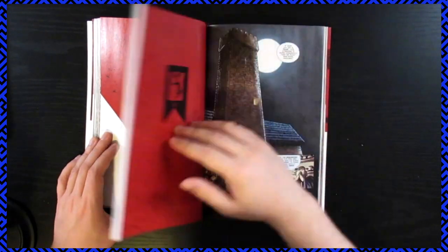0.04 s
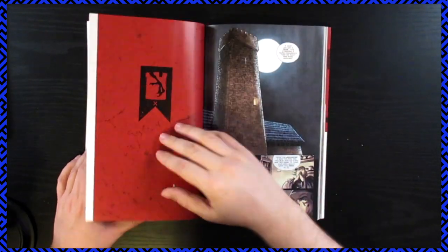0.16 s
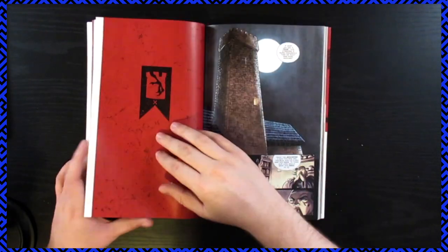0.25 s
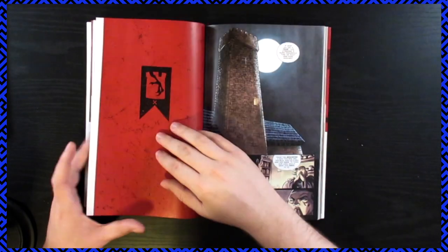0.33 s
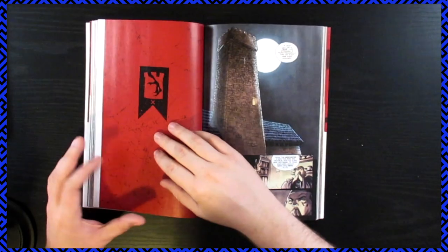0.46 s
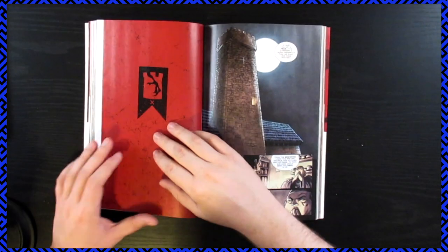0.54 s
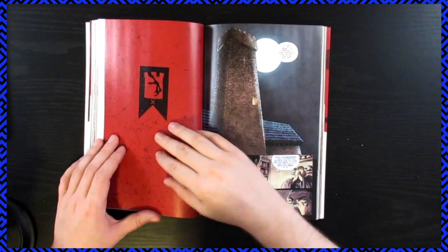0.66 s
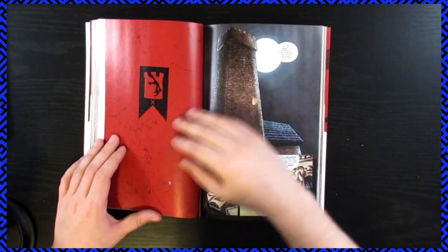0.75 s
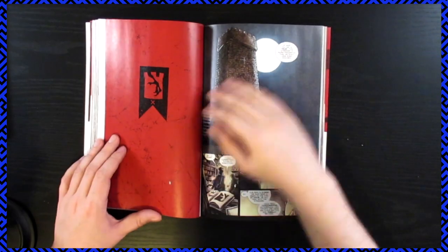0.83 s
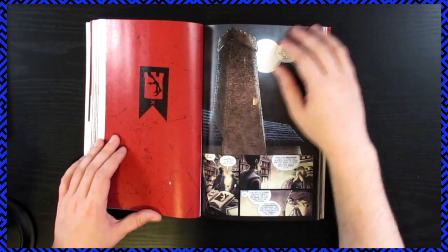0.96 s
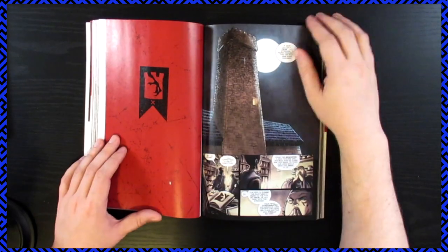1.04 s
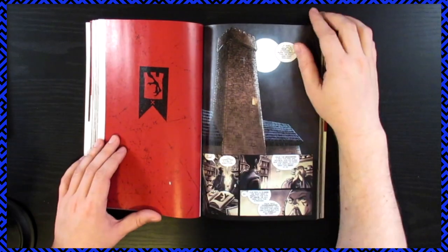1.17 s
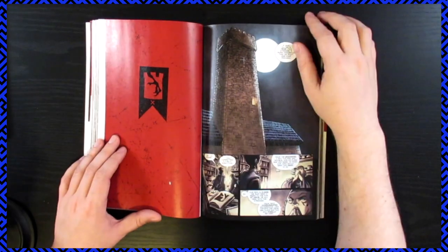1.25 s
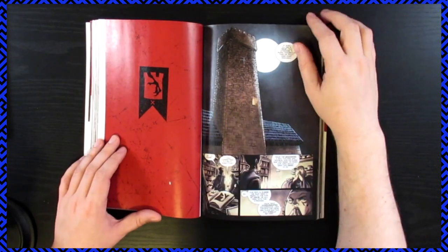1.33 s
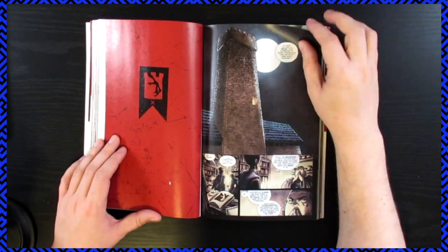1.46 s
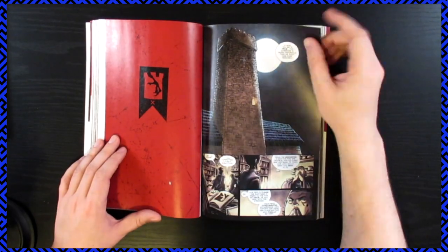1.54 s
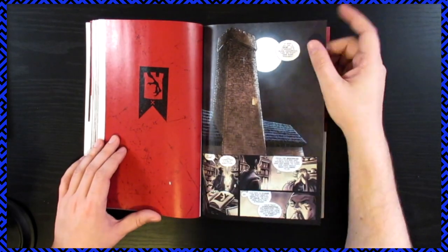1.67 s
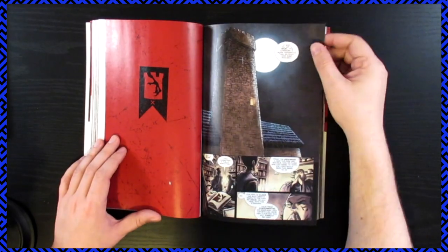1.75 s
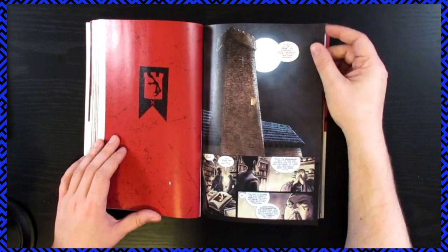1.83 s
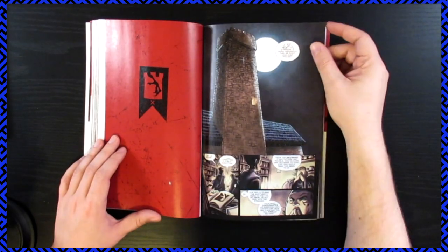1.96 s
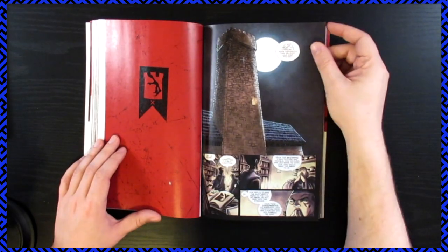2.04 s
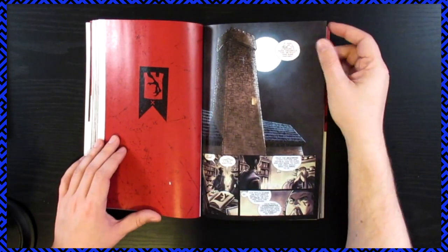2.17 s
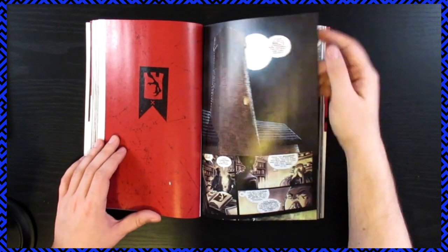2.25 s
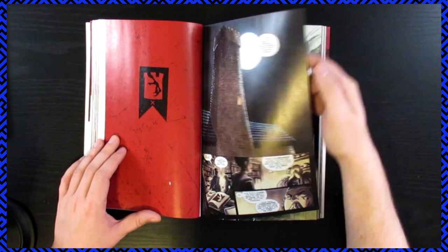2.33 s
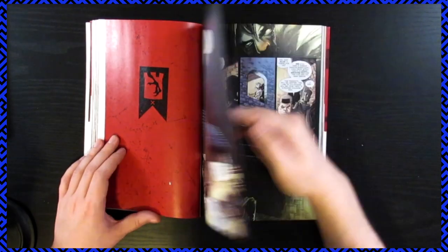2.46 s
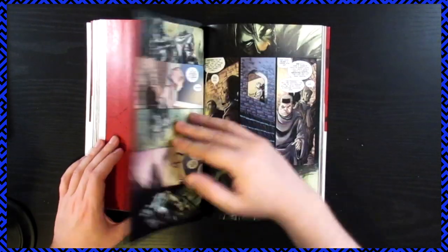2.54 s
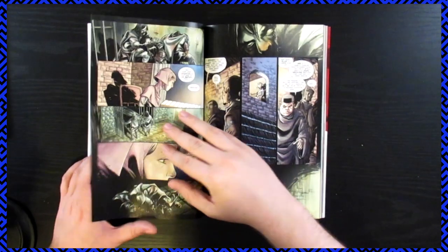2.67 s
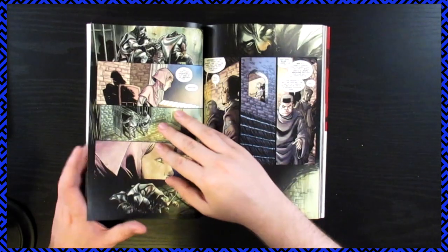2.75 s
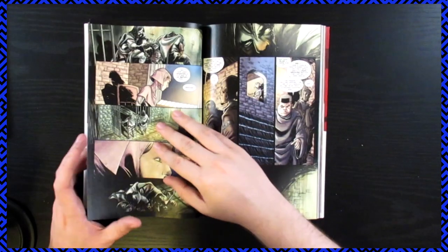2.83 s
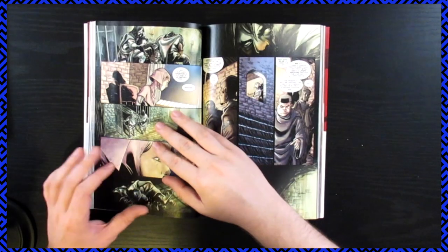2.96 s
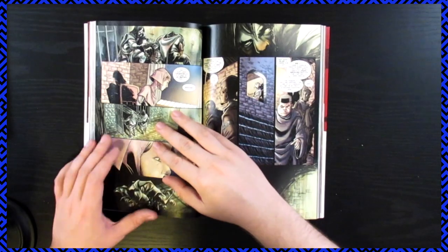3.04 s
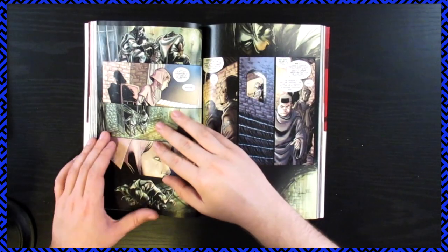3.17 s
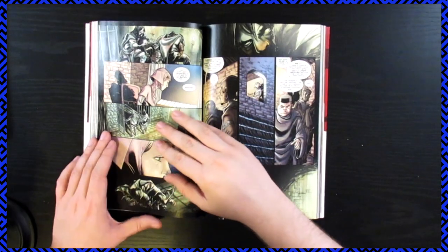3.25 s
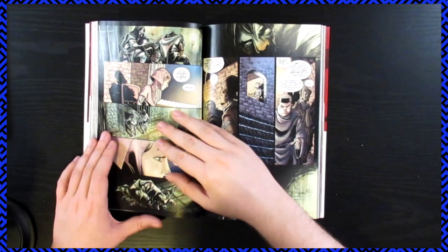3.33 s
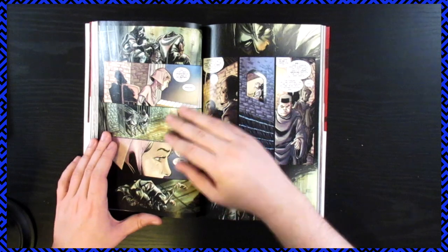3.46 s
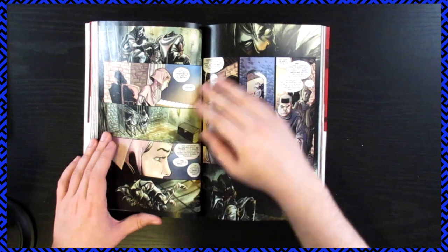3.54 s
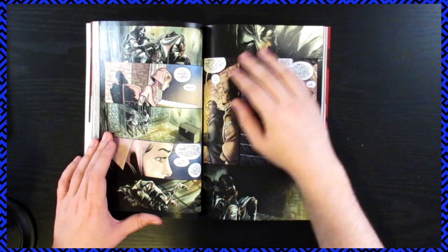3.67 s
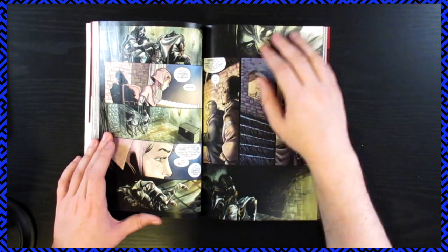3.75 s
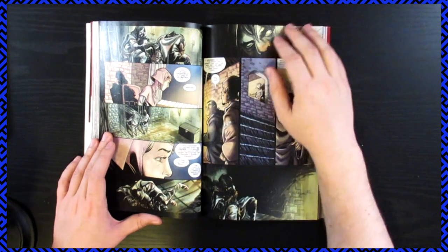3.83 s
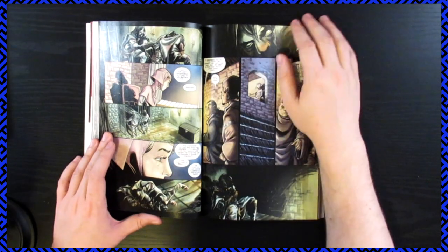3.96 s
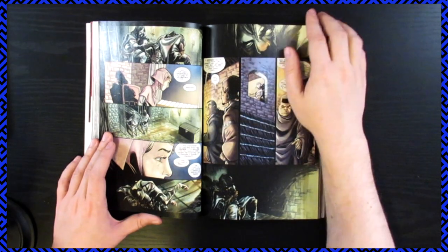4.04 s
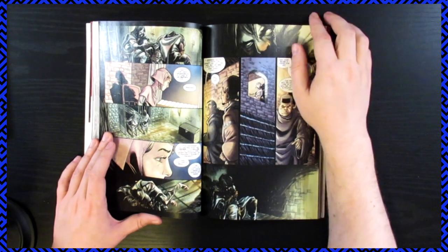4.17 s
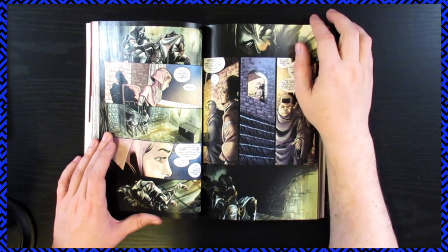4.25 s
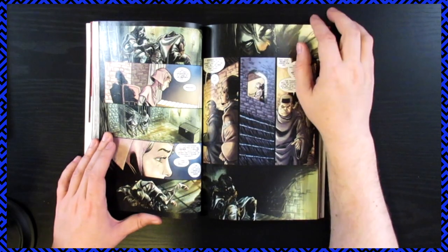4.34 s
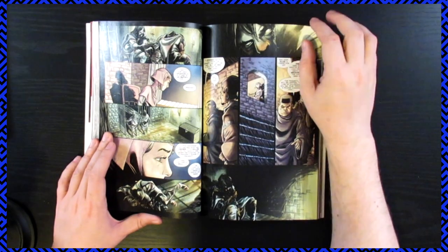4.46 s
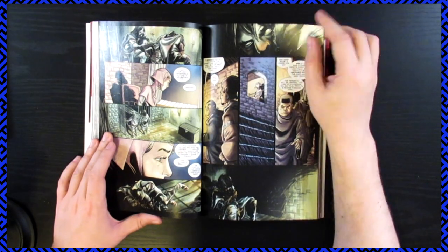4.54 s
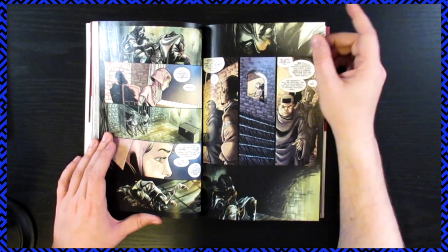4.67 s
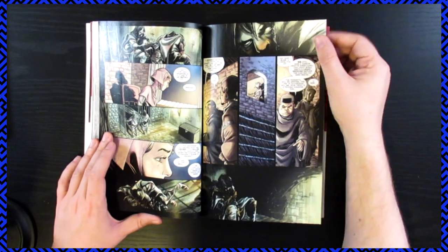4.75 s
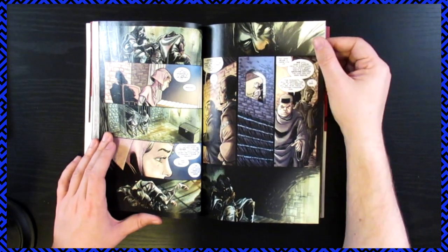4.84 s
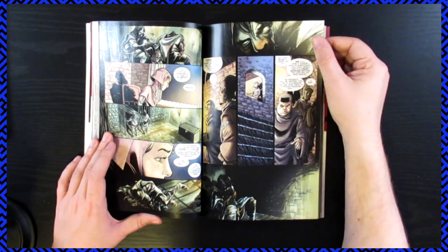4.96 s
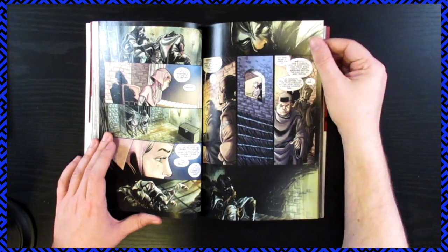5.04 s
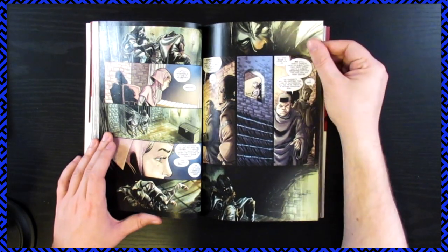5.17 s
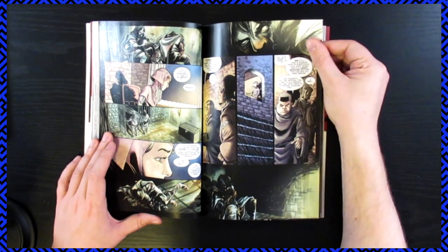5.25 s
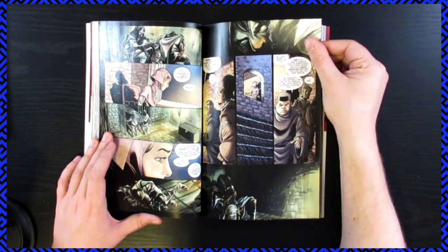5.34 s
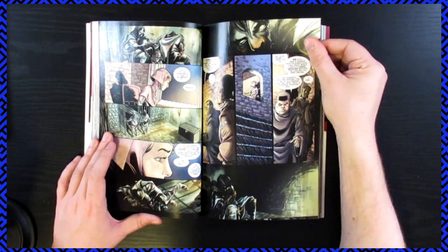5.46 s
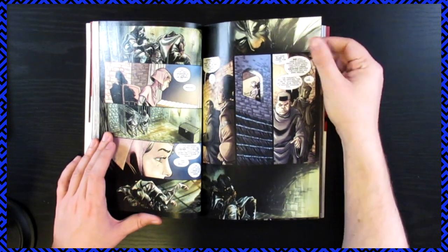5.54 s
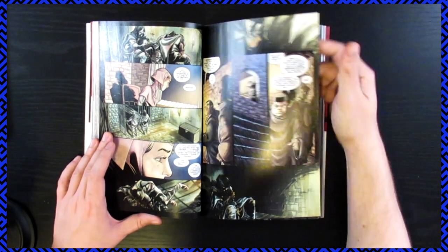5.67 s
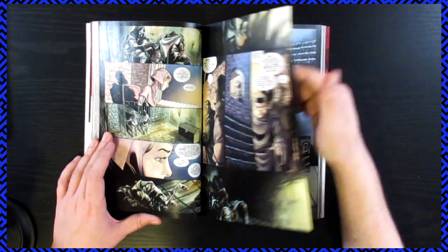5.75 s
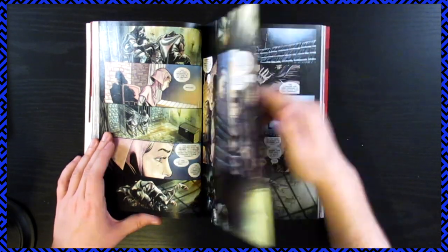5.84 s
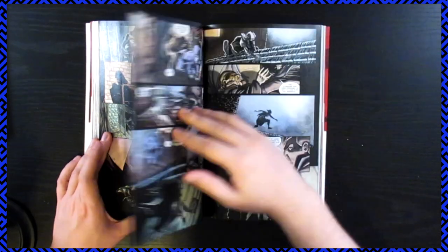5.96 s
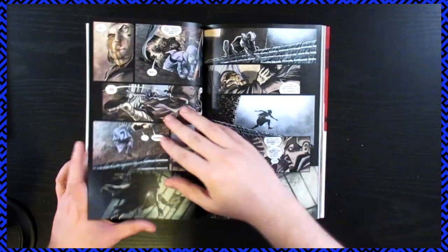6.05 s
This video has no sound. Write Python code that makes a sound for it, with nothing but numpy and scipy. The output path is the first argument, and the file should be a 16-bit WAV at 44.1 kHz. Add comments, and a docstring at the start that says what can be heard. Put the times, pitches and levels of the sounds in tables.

```python
"""Leafing through a glossy paperback

A hand turns the pages of a book on a table, under a microphone that stands on the same table.
Pages snap (bursts ringing resonances), crinkle and flap, and skin slides on the gloss (coloured noises).
A fingertip squeaks once (gliding sine); the arms rock, thrum and bump the table (sines, resonant noise).
A small quiet room answers with decaying noise tails, over a faint bed of air."""
import sys
import numpy as np
from scipy import signal
from scipy.fft import rfft, irfft, next_fast_len
from scipy.io import wavfile
from scipy.ndimage import uniform_filter1d, map_coordinates

SR = 44100
rng = np.random.default_rng(int(sys.argv[2]) if len(sys.argv) > 2 else 0)


def linear_from_db(decibels):
    """Turn decibels (scalar or array-like) into linear amplitude factors; 0 gives 1."""
    return 10 ** (np.asarray(decibels, float) / 20)


def bounce(signal):
    """Save signal as a 16-bit WAV file at the path given by the first command-line argument."""
    frames = np.transpose(np.atleast_2d(signal))
    limited = np.clip(frames, -1, 1)
    pcm = np.round(limited * 32767).astype(np.int16)
    wavfile.write(sys.argv[1], SR, pcm)


N = 269154  # length in samples

# folds that let go: start_s, level_db, pitch_hz, push_db (low push), t60_s (of the burst)
SNAPS = [(0.031, -48, 960, -44.5, 0.053), (0.165, -46, 5830, -70, 0.014), (0.167, -33.5, 920, -37, 0.1),
         (0.2372, -44, 1680, -41, 0.013), (0.279, -39, 1280, -50, 0.067), (0.288, -33, 1230, -49, 0.044),
         (0.292, -38, 3470, -60, 0.03), (0.305, -30.5, 1180, -47, 0.048), (0.347, -36, 1800, -57, 0.021),
         (0.5791, -64, 1570, -46.5, 0.027), (0.59, -41, 6040, -44.5, 0.01), (0.785, -51, 2130, -79, 0.018),
         (1.3915, -55, 3630, -64, 0.028), (1.427, -43, 9000, -70, 0.013),
         (1.4282, -43.5, 2610, -44.5, 0.025), (1.4445, -48, 1890, -61, 0.021),
         (1.506, -29, 4000, -33, 0.0097), (1.6806, -38, 3530, -44, 0.031),
         (1.687, -35.5, 8740, -70, 0.0068), (1.6858, -28.5, 1890, -36.5, 0.061),
         (1.692, -47, 11400, -72, 0.012), (1.694, -28, 1880, -42, 0.04), (1.703, -24, 1220, -45, 0.033),
         (1.712, -23, 1380, -36.5, 0.035), (1.722, -43, 1180, -43, 0.016), (1.733, -33, 1360, -50, 0.022),
         (2.373, -29.5, 960, -32.5, 0.025), (2.632, -50, 1620, -48, 0.012), (2.632, -41, 7050, -70, 0.0085),
         (2.642, -25, 864, -58, 0.0096), (2.666, -22, 1690, -43, 0.0071), (2.668, -34, 3830, -60, 0.015),
         (2.669, -23.5, 1900, -32, 0.018), (2.688, -28, 1900, -46, 0.025), (2.7468, -51, 1750, -43, 0.0081),
         (2.759, -35, 1240, -42, 0.045), (2.85, -38.5, 1440, -52, 0.023), (2.8605, -42, 1750, -36, 0.022),
         (3.0728, -39.5, 4470, -50, 0.0035), (3.397, -54, 1170, -56, 0.014),
         (4.3213, -57.5, 4930, -58, 0.023), (4.451, -46, 7260, -71, 0.014),
         (4.4608, -45, 7450, -54, 0.0037), (4.4963, -36.5, 4900, -68, 0.008),
         (4.514, -33.5, 2300, -37.5, 0.025), (4.756, -53, 1330, -50, 0.036),
         (4.8829, -44.5, 1900, -59, 0.0082), (4.945, -51, 1850, -50.5, 0.041),
         (5.178, -49, 5000, -53, 0.0094), (5.1809, -34, 1900, -36, 0.009), (5.191, -41.5, 1400, -56, 0.027),
         (5.2306, -52, 1990, -50, 0.021), (5.301, -25, 1140, -30.5, 0.015), (5.315, -34, 1400, -57, 0.012),
         (5.3254, -53, 1800, -68, 0.0093), (5.49, -45, 988, -47, 0.017), (5.535, -46, 935, -40.5, 0.022),
         (5.727, -49, 1060, -54, 0.1), (5.789, -49, 800, -38, 0.033), (5.799, -33.5, 600, -45, 0.048),
         (5.826, -55, 705, -35.5, 0.032), (6.044, -46, 9100, -65, 0.026), (6.045, -24, 1130, -30, 0.039),
         (6.0775, -32, 3830, -60, 0.02), (6.077, -24, 1220, -44, 0.05)]
# bumps on the table: start_s, level_db, pitch_hz (of the top), lower_db (lower mode re the top), length_s (to 1/e)
BUMPS = [(0.24, -35, 126.4, -13, 0.053), (0.584, -29, 118.3, -24, 0.045), (0.842, -31.5, 108.5, -10, 0.073),
         (0.979, -25, 127.7, -14, 0.054), (0.982, -30, 190, -30, 0.026), (1.004, -23.5, 126, -0.5, 0.047),
         (1.119, -31, 112, -20, 0.048), (1.479, -40.5, 118.8, -6, 0.1), (1.717, -32.5, 125, -8, 0.039),
         (2.641, -29, 128.4, -4, 0.076), (3.08, -19, 126.7, -7, 0.039), (3.22, -33, 127, -11, 0.037),
         (3.308, -37, 126, -23, 0.046), (3.598, -28, 116.4, -3, 0.039), (3.926, -33.5, 106, -1, 0.023),
         (3.995, -32, 113, -9, 0.036), (5.21, -33.5, 117.8, -12, 0.092), (5.324, -31, 125.6, -4.5, 0.045),
         (5.606, -35, 125, -26, 0.039), (5.842, -34, 125.8, -20, 0.076), (6.059, -30, 125.7, -13, 0.13)]
# the page bends and crinkles: peak_s, level_db, rise_s, fall_s (each spans 20 dB), centre_hz
BENDS = [(0.0, -56, .05, 0.032, 2480), (0.055, -68, 0.026, 0.076, 1050), (0.19, -57.5, 0.037, 0.19, 1320),
         (0.305, -45.5, 0.1, 0.066, 1510), (0.42, -63.5, .08, 0.12, 1410), (0.59, -66, 0.017, 0.08, 2020),
         (0.74, -81, .05, 0.11, 2250), (0.97, -65, 0.33, 0.36, 3080), (1.465, -50, 0.028, 0.079, 4570),
         (1.51, -51, 0.057, 0.12, 2750), (1.77, -56, 0.093, 0.13, 1540), (2.21, -67.5, 0.078, 0.048, 2200),
         (2.3, -59, 0.14, 0.36, 1440), (2.41, -55, 0.13, 0.09, 1210), (2.55, -61.5, 0.23, 0.092, 2870),
         (2.655, -43.5, 0.038, 0.032, 1760), (2.758, -49, 0.093, 0.12, 1310),
         (2.868, -54.5, 0.13, 0.049, 1470), (3.08, -68, 0.036, .12, 2700), (3.214, -71.5, 0.26, 0.14, 1490),
         (3.65, -73, .3, .95, 2700), (4.18, -74, 0.75, .4, 2400), (4.52, -51.5, 0.027, 0.084, 2400),
         (4.76, -65, .04, 0.059, 1530), (4.95, -57, 0.021, 0.13, 1980), (5.01, -59, .08, 0.056, 1940),
         (5.135, -56, 0.094, .04, 1760), (5.19, -63, 0.033, 0.12, 1590), (5.33, -63.5, 0.065, 0.15, 1400),
         (5.49, -61, 0.058, 0.24, 1090), (5.56, -57, .05, 0.043, 1470), (5.585, -63.5, 0.025, 0.029, 4800),
         (5.62, -63, 0.12, 0.17, 970), (5.775, -59.5, 0.21, 0.047, 1010), (5.84, -60, .05, 0.07, 1010),
         (5.87, -67, .04, 0.047, 4500), (5.96, -61, 0.095, 0.026, 3020), (6.06, -39, 0.022, 0.066, 1120)]
USUAL_DB = -30  # level of a middling snap


def unit(x):
    """Scales x to rms 1."""
    return x / np.sqrt(np.mean(x ** 2) + 1e-20)


def along(points, hz):
    """Reads a curve of (Hz, value) points on a log frequency axis."""
    point_hz, values = np.transpose(points)
    return np.interp(np.log(hz + 1), np.log(point_hz + 1), values)


def curves(rows):
    """Gives one value per sample for each column after the time."""
    times, *columns = np.transpose(rows)
    return [np.interp(np.arange(N) / SR, times, column) for column in columns]


def wobble(rate):
    """Draws a smooth random curve with rate knots a second."""
    return map_coordinates(rng.standard_normal(N // 20), [np.arange(N) * rate / SR])


def filtered(x, response):
    """Multiplies the spectrum of x by a response of frequency."""
    size = next_fast_len(len(x) + 8192)
    return irfft(rfft(x, size) * response(np.fft.rfftfreq(size, 1 / SR)), size)[:len(x)]


def peak(f, hz, width):
    """Response of one causal resonance, 1 at its centre."""
    return 1j * f * width / (hz * hz - f * f + 1j * f * width)


def steady(x, size):
    """Divides out the slow level drift of x and scales it to rms 1."""
    return unit(x / np.sqrt(np.abs(uniform_filter1d(x ** 2, size=size)) + 1e-20))


def add(track, s, sound):
    """Mixes a sound into the track at time s."""
    track[int(s * SR):][:len(sound)] += sound


def rustle(colour_db, grain_db, clump_db, patchy_db):
    """Noise of rms 1 whose tiny impacts vary in size, clump, and change colour in patches.

    colour_db is a function of (Hz, s)."""
    sizes = linear_from_db(grain_db * wobble(900) + clump_db * wobble(60))
    hz, t, z = signal.stft(sizes * rng.standard_normal(N), SR, nperseg=512)
    patches = uniform_filter1d(rng.standard_normal(z.shape), size=4, axis=0)  # over frequency
    patches = uniform_filter1d(patches, size=10, axis=1)  # over time
    z = z * linear_from_db(patchy_db * unit(patches) + colour_db(hz[:, None], t))
    return steady(signal.istft(z, nperseg=512)[1][:N], size=4000)


def gestures(rows, roundness):
    """Gain of overlapping swells, and their power-weighted colour as a function of time."""
    t, power, colour = np.arange(N) / SR, 1e-12, 0
    for s, db, rise, fall, value in rows:
        distance = np.abs((t - s) / np.where(t < s, rise, fall))
        swell = linear_from_db(db - 20 * distance ** roundness) ** 2 + 1e-20
        power = power + swell
        colour = colour + value * swell
    usual = np.mean(rows, axis=0)[-1]  # colour where nothing swells
    blend = (colour + 1e-12 * usual) / power
    return np.sqrt(power), lambda at: np.interp(at, t, blend)


def fading(starts):
    """Gain of sudden sounds (start_s, level_db, t60_s) dying away."""
    power, t = np.zeros(N + SR), np.arange(SR // 2) / SR
    for s, db, t60 in starts:
        add(power, s, linear_from_db(db - 60 * t / t60) ** 2)
    return np.sqrt(power[:N])


def still_air():
    """A faint steady bed of noise, darker towards the treble."""
    # colour of the air: hz, level_db (relative, per Hz)
    air_colour = [(100, -25), (170, 3), (250, 0), (500, -5), (1000, -11), (2000, -15), (4000, -19),
                  (8000, -23), (12500, -25.5), (15800, -27)]
    return linear_from_db(-66.5) * rustle(lambda hz, t: along(air_colour, hz), grain_db=.1, clump_db=.3, patchy_db=1.5)


def room(x):
    """Each frequency of the room's answer dies at its own speed; every quarter second gets a new tail."""
    # decay of the room: hz, t60_s
    decay = [(300, 0.28), (2000, 0.15), (10000, 0.19)]
    wet, step = np.zeros(N + SR), SR // 4
    for start in range(0, N, step):
        hz, t, z = signal.stft(rng.standard_normal(SR // 2), SR, nperseg=256)
        z = z * linear_from_db(-60 * t / along(decay, hz)[:, None])
        tail = signal.istft(z, SR, nperseg=256)[1]
        answer = signal.fftconvolve(x[start:start + step], tail / np.linalg.norm(tail))
        add(wet, start / SR + .006, answer)
    return wet[:N]


def air_gap(book):
    """The air between book and microphone lifts a few broad bands."""
    # lifts: hz, width_hz, lift_db
    lifts = [(1200, 300, 3), (2000, 450, 6), (3400, 500, 2), (4800, 600, 4), (7100, 700, 4)]
    return filtered(book, lambda f: 1 + sum((linear_from_db(db) - 1) * peak(f, hz, width) for hz, width, db in lifts))


def table_sway(sway_db):
    """The table legs rock slowly and unevenly: sines of wandering pitch and level."""
    # rocking of the legs: hz, level_db (relative)
    legs = [(26.5, 4), (39, -0.5)]
    sway = 0
    for hz, db in legs:
        phase = 2 * np.pi * np.cumsum(hz * (1 + 0.0758 * wobble(8))) / SR
        sway = sway + linear_from_db(db + 1.34 * wobble(22)) * np.sin(phase + rng.uniform(0, 2 * np.pi))
    return linear_from_db(sway_db + 3.5 * wobble(7.9)) * unit(sway)  # the arms lean unevenly


def table_thrum(thrum_db):
    """The table top thrums: noise through its modes, each resonance passed twice."""
    # modes of the top: hz, width_hz (of one pass), level_db (relative)
    modes = [(85.2, 27.5, -1.5), (121.8, 41, -2.3), (143.6, 32.6, -10), (203.8, 33, -24.5)]

    def top(f):
        signs = [(-1) ** k for k in range(len(modes))]
        return sum(sign * linear_from_db(db) * peak(f, hz, width) ** 2 for sign, (hz, width, db) in zip(signs, modes))

    thrum = steady(filtered(rng.standard_normal(N), top), size=5000)
    return linear_from_db(thrum_db + 2 * wobble(13)) * thrum  # the arms lean unevenly


def table_bumps():
    """A bump sounds three modes of the table for a few cycles."""
    lower_hz, upper_hz, upper_db = 75.2, 195.8, -23.5
    track, t = np.zeros(N + SR), np.arange(SR // 4) / SR
    tone = lambda hz: np.sin(2 * np.pi * hz * t)
    for s, db, hz, lower_db, length in BUMPS:
        swell = (1 - np.exp(-t / 0.01)) * np.exp(-(t / length) ** 3)  # the soft hand damps what it started
        modes = tone(hz) + linear_from_db(lower_db) * tone(lower_hz) + linear_from_db(upper_db) * tone(upper_hz)
        add(track, s - .008, linear_from_db(db) * swell * modes)
    return track[:N]


def table():
    """The arms shake the table: its legs sway, its top thrums, and bumps ring it."""
    # shaking under the arms: time_s, sway_db (slow rocking), thrum_db (table top)
    shake = [(0.0, -52, -45.5), (0.25, -33, -47.5), (0.34, -44, -42.5), (0.75, -28, -44),
             (0.87, -39, -43.5), (0.97, -36, -38.5), (1.38, -44.5, -51), (2.44, -49.5, -48),
             (2.8, -32, -50.5), (3.13, -39.5, -42.5), (3.38, -32.5, -45), (3.45, -47, -51),
             (3.6, -33, -44.5), (3.86, -46, -54.5), (3.89, -37, -50.5), (4.18, -47, -47),
             (5.11, -46.5, -50), (5.25, -42, -49.5), (5.61, -57, -49), (6.1, -39, -42)]
    sway_db, thrum_db = curves(shake)
    return table_sway(sway_db) + table_thrum(thrum_db) + table_bumps()


def squeak():
    """A fingertip squeaks: one sine glides down with a trembling level."""
    # the squeak: time_s, pitch_hz, level_db
    glide = [(3.105, 7140, -90), (3.12, 7000, -80), (3.16, 6500, -78), (3.19, 6360, -73),
             (3.205, 6250, -90)]
    hz, db = curves(glide)
    tone = linear_from_db(db + 1.7 * wobble(120)) * np.sin(2 * np.pi * np.cumsum(hz) / SR)
    seconds = np.arange(N) / SR
    return tone * (seconds > glide[0][0]) * (seconds < glide[-1][0])


def flapping_pages():
    """A loose page flaps low: when lifted, while bending, after each snap or bump, and faintly throughout."""
    # a lifted page flaps through the air: peak_s, level_db, rise_s, fall_s (each spans 20 dB)
    flaps = [(0.055, -44, 0.1, 0.06), (0.3, -66, 0.14, .08), (0.69, -63, 0.057, 0.052),
             (1.95, -57, 0.031, 0.035), (2.45, -49.5, 0.11, .16), (2.53, -52.5, .04, 0.071),
             (2.621, -43, 0.033, 0.12), (2.868, -52, 0.038, 0.055), (3.22, -53.5, 0.07, 0.13),
             (3.9, -57, 0.08, 0.13), (4.42, -59.5, 0.36, 0.12), (4.66, -63, 0.12, 0.43),
             (5.12, -55, .12, 0.15), (5.61, -45.5, 0.16, 0.098), (5.803, -41, 0.022, 0.1),
             (5.97, -55, 0.047, 0.23)]
    # colour of flapping: hz, level_db (relative, per Hz)
    flap_colour = [(170, 10), (260, 0), (450, 1.5), (800, -5.5), (1400, -19.5), (3000, -99)]
    lasts = 8.3  # t60 over the snap's t60 or the bump's length
    lifted, _ = gestures([(*row, 0) for row in flaps], roundness=1.8)
    bend, _ = gestures(BENDS, roundness=1.13)
    after_snaps = [(s, push_db - 9, lasts * t60) for s, _, _, push_db, t60 in SNAPS]
    after_bumps = [(s, db - 29, lasts * length) for s, db, _, _, length in BUMPS]
    loose = fading(after_snaps + after_bumps)
    idle = linear_from_db(-69 + 3.5 * wobble(6.5))
    gain = np.sqrt(loose ** 2 + lifted ** 2 + (linear_from_db(-4.5) * bend) ** 2 + idle ** 2)
    return gain * rustle(lambda hz, t: along(flap_colour, hz), grain_db=0.5, clump_db=1.5, patchy_db=2.5)


def sliding_skin():
    """Skin slides over the gloss with a smooth hiss, and a hiss trails each snap."""
    # strokes: peak_s, level_db, rise_s, fall_s (each spans 20 dB), brightness (dB per octave)
    strokes = [(0.02, -55, 0.071, 0.19, -3), (0.28, -48.5, 0.17, 0.098, -3), (0.7, -65, .1, .08, 0),
               (0.84, -57, 0.075, 0.21, 0.5), (1.0, -60.5, 0.27, .17, -0.5), (1.48, -53, .1, 0.17, -3),
               (1.76, -54.5, 0.15, 0.21, -3), (2.24, -62.5, 0.16, 0.29, 0), (2.44, -53.5, 0.19, 0.14, -3),
               (2.55, -60, 0.076, 0.28, -1), (3.23, -62, .07, 0.076, -3), (3.47, -60.5, 0.07, 0.6, 0.5),
               (3.66, -58.5, 0.57, 0.58, 0), (4.2, -70, 0.87, 0.82, -2.5), (4.53, -65.5, 0.02, 0.52, -1.5),
               (4.76, -65, 0.24, 0.1, -2.5), (4.97, -68, 0.049, 0.12, -2), (5.12, -69, .08, .05, -3),
               (5.6, -55.5, .1, 1, -3.5), (5.84, -49, .05, .07, -4), (5.97, -63, 0.056, 0.13, 1.5)]
    # colour of skin on gloss: hz, level_db (relative, per Hz)
    skin_colour = [(500, -3.5), (1100, 5.5), (2400, 1.5), (3300, 6.5), (5700, 2), (8500, 4), (11000, 1),
                   (13700, 4), (15800, -2)]
    stroke, brightness = gestures(strokes, roundness=1.25)
    # a trailing hiss grows 0.2 dB per dB of snap and lasts 3.8 times the burst's t60
    hiss = fading([(s, -58.5 + 0.2 * (db - USUAL_DB), 3.8 * t60) for s, db, _, _, t60 in SNAPS])
    gloss = lambda hz, t: along(skin_colour, hz) + brightness(t) * np.log2((hz + 1) / 9000)
    return np.hypot(stroke, hiss) * rustle(gloss, grain_db=1.1, clump_db=0.5, patchy_db=-0.5)


def crinkle():
    """Bending paper crackles in grainy noise, centred higher where the fold is tight."""
    bend, centre_hz = gestures(BENDS, roundness=1.13)

    def fold(hz, t):
        octaves = np.log2((hz + 1) / centre_hz(t))
        steepness = np.where(octaves > 0, 7, 13)  # dB down one octave above or below the centre
        return -steepness * np.abs(octaves) ** 1.247

    return bend * rustle(fold, grain_db=3.2, clump_db=1.4, patchy_db=2.6)


def snaps():
    """A fold lets go: a short burst rings the sheet at its own pitch, with a bright tick and a low push."""
    track, t = np.zeros(N + SR), np.arange(2048) / SR
    top = lambda x: x / np.abs(x).max()
    for s, db, hz, push_db, t60 in SNAPS:
        # the tick grows 0.33 dB per dB of snap, and 4 dB per octave: tighter folds tick brighter
        tick_db = -56 + 0.33 * (db - USUAL_DB) + 4 * np.log2(hz / 1500)
        rise = 1 - np.exp(-t / (.05 * t60))  # a long fold takes longer to let go
        fall = linear_from_db(-60 * t / np.clip(t60, .002, .1))
        jolts = np.sign(rng.standard_normal((3, len(t)))) * rise * fall
        sheet = filtered(jolts[0], lambda f: peak(f, hz, 0.44 * hz) * peak(f, hz, 2.56 * hz) ** 2)
        tick = filtered(jolts[1] * linear_from_db(-60 * t / .015), lambda f: peak(f, 7500, 9000) ** 2)
        push = filtered(jolts[2], lambda f: peak(f, 451, 660) ** 2)
        add(track, s - .001, linear_from_db(db) * top(sheet) + linear_from_db(tick_db) * top(tick) + linear_from_db(push_db) * top(push))
    return track[:N]


def scene():
    """Paper and hands in the room, over the shaking table and the still air."""
    paper = snaps()
    moves = sliding_skin() + crinkle() + flapping_pages() + squeak()
    book = paper + moves + room(linear_from_db(-6.5) * paper + linear_from_db(-9.5) * moves)
    return (air_gap(book) + table() + still_air())[None]


def low_pass(x):
    """Removes everything above the highest recorded frequency."""
    return signal.sosfilt(signal.butter(12, 16530, fs=SR, output="sos"), x)


def record(dry):
    """Cuts everything above the band limit and finishes the mix."""
    top_hz = 15830
    mix = filtered(dry[0], lambda f: f < top_hz)[None]
    return low_pass(mix)


dry = scene()
out = record(dry)
bounce(out)
```